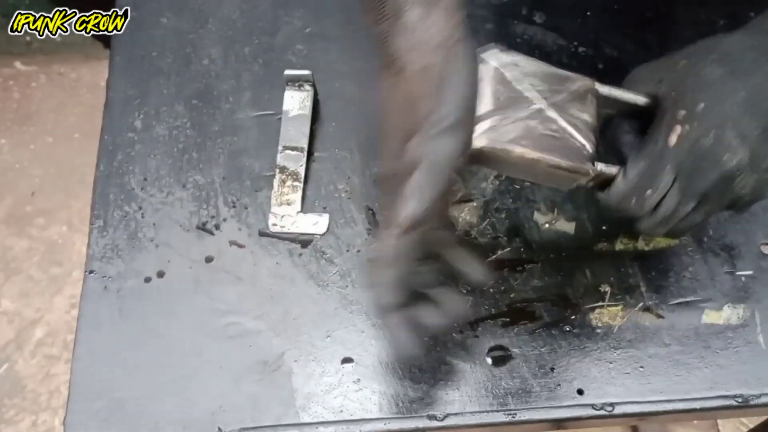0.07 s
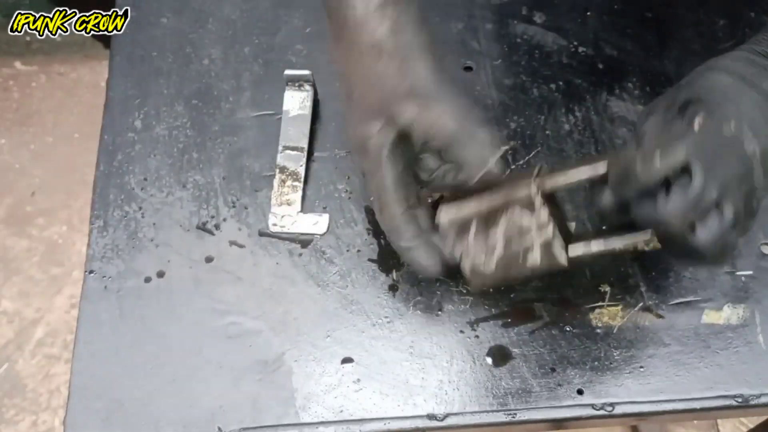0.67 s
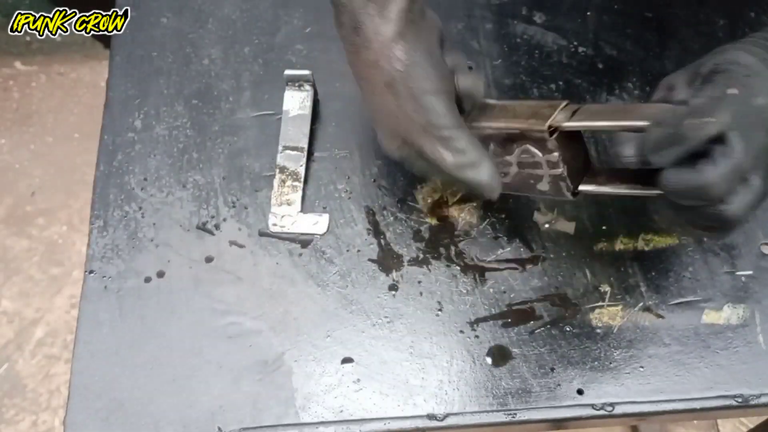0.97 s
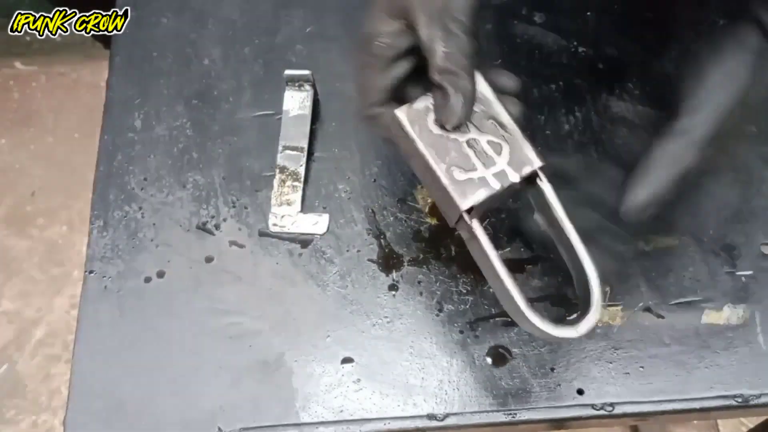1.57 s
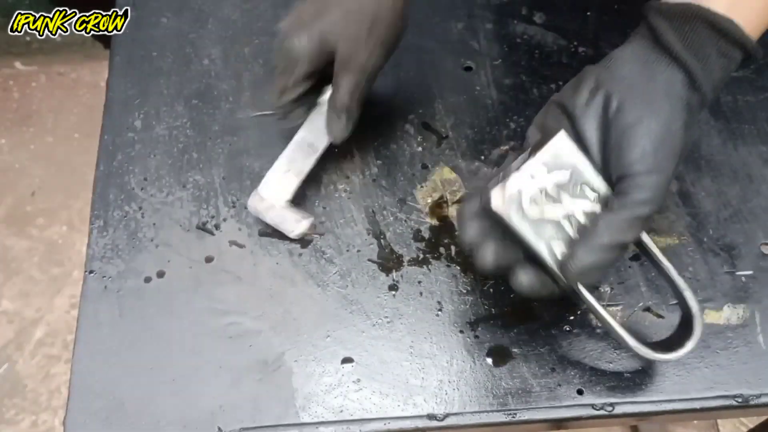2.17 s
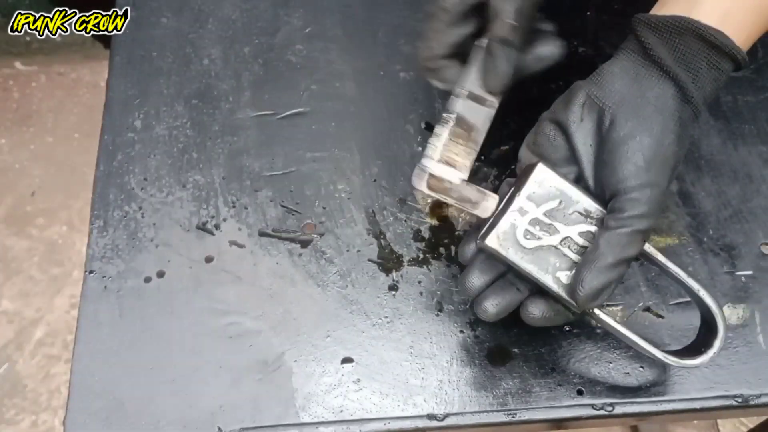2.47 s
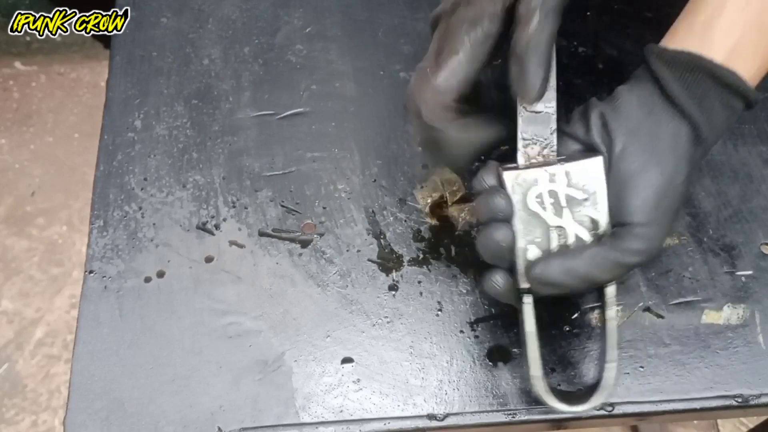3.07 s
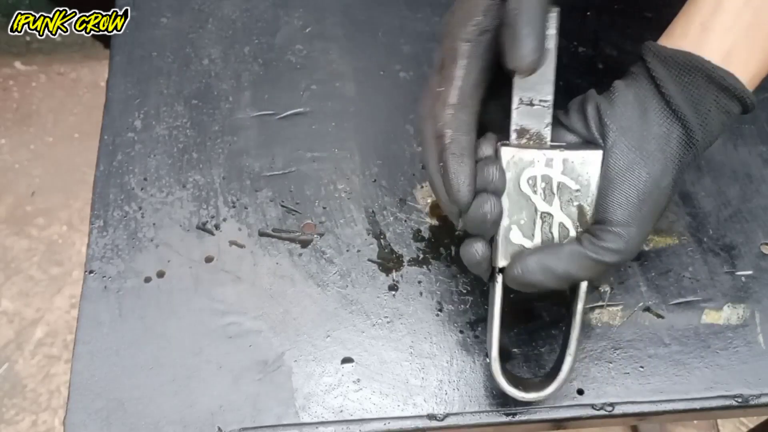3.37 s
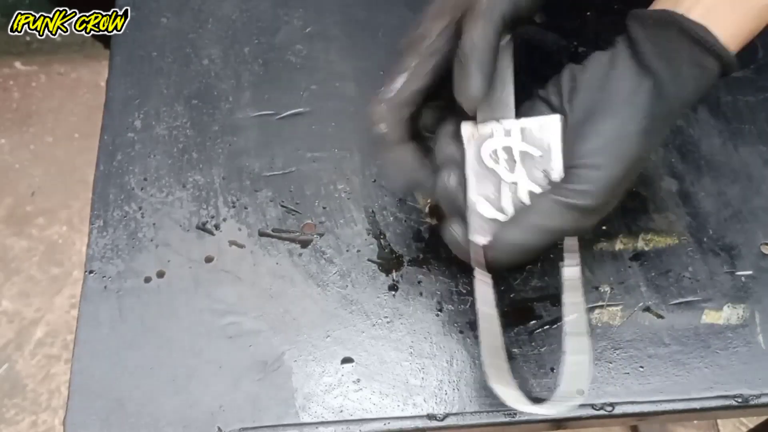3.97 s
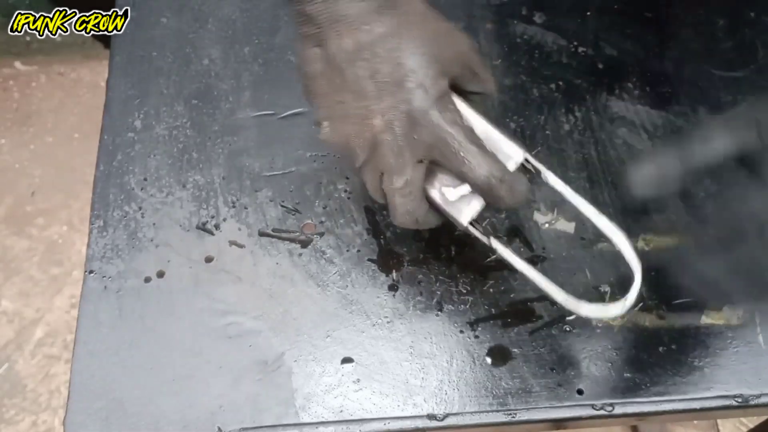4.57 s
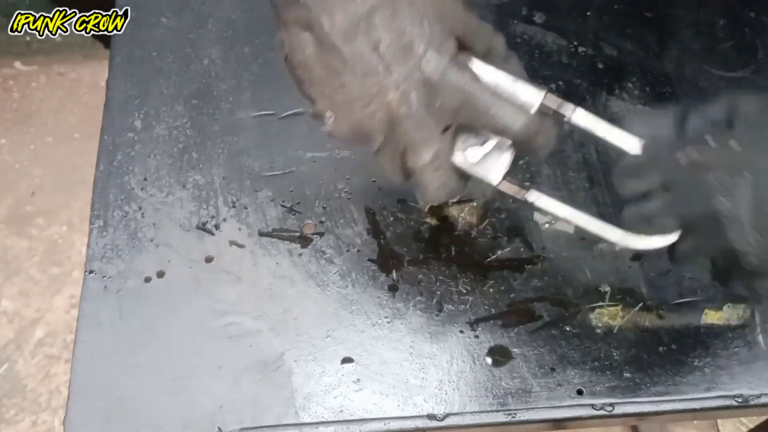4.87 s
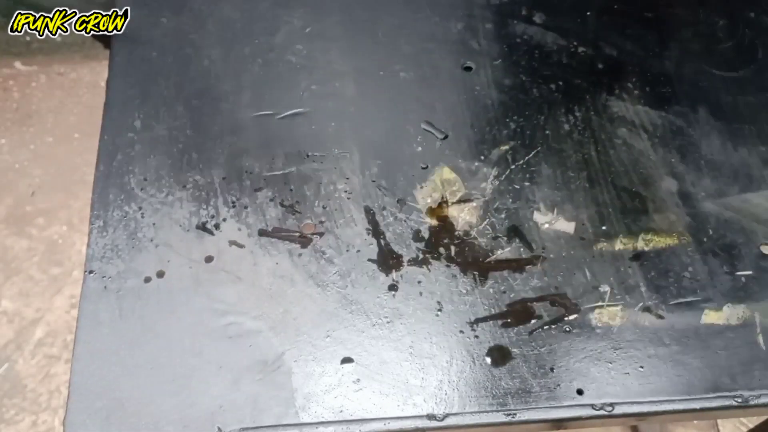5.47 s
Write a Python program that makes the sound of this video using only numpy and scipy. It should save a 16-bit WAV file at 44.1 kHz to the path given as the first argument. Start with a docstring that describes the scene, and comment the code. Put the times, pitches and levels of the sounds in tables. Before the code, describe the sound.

Close to the microphone in a hard-walled workshop, a loud metallic clank and thump come first as a padlock hits a metal bench. Lighter, irregular clacks of its shackle follow, with soft glove rubbing. A flat key drags, taps and clicks its way into the lock until the bolt gives a bright snap. After a quieter moment come two last ringing clinks, over a faint low hum.

```python
"""A hard, echoing workshop, a small microphone close to a sheet-metal bench. A heavy steel padlock is
tipped onto the bench, which thumps and rings; turned over in gloved hands, its shackle clacks in the body.
At 2.2 s a flat key is slid off the bench, then tapped into the slot and pushed until the bolt snaps at
3.9 s. Gloves rub, and the shackle clacks again at the end. Throughout, the microphone's gain control
ducks the loudest blows and the room hums faintly behind."""
import sys
import numpy as np
from scipy import signal
from scipy.fft import rfft, irfft
from scipy.io import wavfile
from scipy.ndimage import uniform_filter1d

SR = 44100
rng = np.random.default_rng(int(sys.argv[2]) if len(sys.argv) > 2 else 0)


def transcribe(u):
    """Save the signal u as a 16-bit wav file named by the first command-line argument.

    u: samples, shape (n,) or (channels, n), limited to [-1, 1]; the rate is SR.
    q: integer samples, one column per channel.
    """
    v = np.clip(np.atleast_2d(u).T, -1, 1)
    q = np.round(v * 32767).astype(np.int16)
    wavfile.write(sys.argv[1], SR, q)


N = 247401
TIME = np.arange(N) / SR


# steel contacts near the microphone: t/s, lead of a first touch/s (0: none), chatter/s, knock/dB, crack/dB,
# low shackle ring/dB, body ping/dB, high shackle ring/dB, echoes against the direct sound/dB
CONTACTS = [(0.1134, 0.0039, 0.0044, -32, -36.5, -52, -46, -41, -2.5),
            (.125, 0.00094, 0.03, -6, 5, -8, -5, -10.5, -11.5),
            (0.18, 0.0034, 0.16, -42.5, -22, -16, -23.5, -22.5, -2),
            (.249, 0, 0.022, -35, -27, -23.5, -32, -32.5, -22),
            (0.494, 0.022, .13, -43, -27.5, -30, -34, -28, -5),
            (0.5584, 0.025, 0.11, -45.5, -24.5, -33, -35, -48, -6),
            (0.826, 0.0031, 0.026, -61.5, -59, -75, -65.5, -62, -3.5),
            (0.9015, 0.0054, 0.036, -56.5, -39, -50.5, -70, -64, -9.5),
            (1.237, 0.0049, 0.015, -58.5, -57.5, -75, -51, -77.5, -0.5),
            (1.2856, 0, 0.0075, -45.5, -45, -48.5, -48.5, -71, -4),
            (1.3836, 0.004, 0.0075, -49.5, -51, -64, -50, -61, -4.5),
            (1.564, 0.02, 0.055, -39.5, -36, -55, -27.5, -59, -5.5),
            (1.929, 0.0095, 0.069, -46.5, -44.5, -46.5, -49.5, -53, -2),
            (1.965, 0, 0.034, -44, -35, -34.5, -46, -44, -8.5),
            (2.7, 0.0064, 0.14, -62, -39.5, -39.5, -74, -54, -3.5),
            (2.728, 0, .045, -68, -47, -60, -69.5, -53.5, 0.5),
            (2.7703, .007, 0.044, -45.5, -33, -37, -46, -48, -5.5),
            (3.329, 0.0046, 0.043, -42.5, -31, -38, -44, -40, -7.5),
            (3.9086, 0.0016, 0.024, -30.5, -19, -39, -38, -47, -7.5),
            (5.1, 0.00077, .02, -69, -67, -75.5, -78, -83.5, 0.5),
            (5.3112, 0.0096, 0.0077, -47, -46.5, -55, -50, -54, -5),
            (5.4489, 0.0059, 0.057, -41, -23.5, -37, -41, -32, -3.5),
            (5.5284, 0.012, 0.078, -53, -29, -23.5, -44, -30.5, -8.5)]
CASE_KNOCKS = [(0.4942, -51), (1.385, -63.5), (1.93, -55.5), (3.805, -61), (3.886, -50.5), (3.909, -37),
               (5.451, -48.5)]   # blows that sound the hollow case: t/s, level/dB
CASE_MODES = [(880, 5.5, 0.02), (979, -1.5, 0.13), (1118, 6, 0.017)]   # the case: f/Hz, level/dB, t60/s
FREE_RINGS = [(0.124, -12), (0.5, -50), (5.53, -37.5)]   # blows after which the shackle rings on: t/s, level/dB
SHACKLE_MODES = [(2637, -12, 0.32), (2745, -6.5, 0.27), (2815, -5, 0.41), (2868, 2, 0.5),
                 (3023, -8.5, 0.56), (3778, -14, .45), (4270, -9.5, 0.48), (4477, -11, .36),
                 (5200, -13, 0.3), (5400, -7, 0.27), (5600, -7, .33), (5885, -6, .35), (6725, -8, 0.4),
                 (6973, -10, 0.38)]   # the free shackle: f/Hz, level/dB, t60/s
def padlock(touch_db=-6, touch_db_per_s=-800, touch_chatter_s=0.017):
    """Close up, many clacks are led by a light touch; some blows sound the case or the free shackle."""
    out = np.zeros(N)
    for s, lead_s, chatter_s, *levels_db in CONTACTS:
        add(out, s, clack(chatter_s, *levels_db))
        if lead_s > 0:
            touch_gain = from_db(touch_db + touch_db_per_s * lead_s)   # the earlier, the lighter
            add(out, s - lead_s, touch_gain * clack(touch_chatter_s, *levels_db))
    for s, db in CASE_KNOCKS:
        case = from_db(db) * ring(CASE_MODES, vary_db=2, detune=0.01, size=8192)
        add(out, s, workshop(case, room_db=-1.5))
    for s, db in FREE_RINGS:
        add(out, s, from_db(db) * ring(SHACKLE_MODES, vary_db=0.5))
    return out


KNOCK_SPECTRUM = [(100, -48), (300, -26), (520, -16), (750, -5.5), (1000, -3), (1280, -4.5), (1650, -1.5),
                  (2000, 1.5), (2450, -2), (3000, 4.5), (4500, -34)]   # the dull part of a clack: f/Hz, level/dB
CRACK_SPECTRUM = [(900, -28.5), (2000, -28.5), (2700, -0.5), (3500, -2), (4900, -0.5), (6200, 2),
                  (7600, -6), (9000, -3.5), (15000, -1)]   # its bright part: f/Hz, level/dB
LOCK_MODES = [
    [(2875, 0, .06), (2845, -5, .05), (2755, -10, .04), (3025, -11, .04)],
    [(4030, 0, .014), (4140, -9, .025), (4430, -13, .03)],
    [(5440, 0, .05), (5660, -1, .05), (5860, -4, .05), (6200, -9, .04)],
    [(6730, -5, .05), (6970, -5, .04), (7300, -2, .035), (7570, 0, .05)],
]   # the held lock in four groups (low, ping, high, top): f/Hz, level/dB, t60/s
GRIP_DETUNE = [.003, .008, .012, .015]   # the grip shifts the pitches: spread/fraction for each group
def clack(chatter_s, knock_db, crack_db, low_db, ping_db, high_db, room_db, ping_echo_share=0.69):
    """Steel on steel: a knock, a bright crack and a ring choked by the glove, echoed by the walls."""
    knock = from_db(knock_db) * burst(KNOCK_SPECTRUM, t60=chatter_s * 1.1, rise_s=0.00025)
    crack = from_db(crack_db) * burst(CRACK_SPECTRUM, t60=chatter_s * 0.52, rise_s=0.00051)
    groups_db = [low_db, ping_db, high_db, crack_db - 9.5]   # the top group follows the crack
    low, ping, high, top = [from_db(db) * ring(modes, vary_db=1.5, detune=detune, size=8192)
                            for db, modes, detune in zip(groups_db, LOCK_MODES, GRIP_DETUNE)]
    out = workshop(knock + crack + low + ping_echo_share * ping + high + top, room_db)
    add(out, 0, (1 - ping_echo_share) * ping)   # the palm shields this part from the walls
    return out


BOLT_SNAPS = [(3.9086, -16)]   # the key drives the spring bolt home: t/s, level before the low cut/dB
BOLT_SPECTRUM = [(700, -39), (1300, -45), (1650, -1), (2100, 2), (2650, 11.5), (3100, 6), (3450, 2.5),
                 (4200, 1), (5200, -10.5), (7500, 0.5), (9000, -28)]   # the snap: f/Hz, level/dB
def bolt(low_cut_hz=1000):
    """The released bolt strikes its stop in one short, dense, bright snap, with the bass filtered out."""
    out = np.zeros(N)
    low_cut = signal.butter(4, low_cut_hz, "high", fs=SR, output="sos")
    for s, db in BOLT_SNAPS:
        snap = signal.sosfilt(low_cut, burst(BOLT_SPECTRUM, t60=0.0073, rise_s=0.00041))
        add(out, s, workshop(from_db(db) * snap, room_db=-3.5))
    return out


BENCH_JOLTS = [(0.1255, -11, -22), (3.909, -51, -63.5)]   # the lock jolts the bench: t/s, thump/dB, sheet ring/dB
THUMP_MODES = [(76, -13, 0.036), (115.3, -4, 0.082), (166, 4, 0.036), (204, -4, 0.02), (345, 3, 0.036),
               (510, 6, 0.026)]   # the flexing bench top: f/Hz, level/dB, t60/s
SHEET_MODES = [(525, -6.5, .048), (640, -5, 0.074), (720, -3, 0.084), (772, -5, .08), (810, -2, .11)]   # its ringing sheet: f/Hz, level/dB, t60/s
def bench():
    """The lock's weight flexes the bench: the thump reaches the microphone dry, the ring with echoes."""
    out = np.zeros(N)
    for s, thump_db, sheet_db in BENCH_JOLTS:
        add(out, s, from_db(thump_db) * ring(THUMP_MODES, vary_db=1))
        add(out, s, workshop(from_db(sheet_db) * ring(SHEET_MODES), room_db=0))
    return out


KEY_DRAGS = [(2.238, -51), (2.299, -55)]   # gritty pushes across the bench: t/s, level/dB
KEY_MODES = [(2520, -2, 2.3), (3500, -3, 3.2)]   # the key held free: f/Hz, level/dB, t60/s
KEY_TICKS = [(2.9514, 0.047, -61, -62.5), (2.9876, 0.015, -59, -50.5), (3.059, .06, -59.5, -51),
             (3.079, 0.051, -57, -54.5), (3.524, 0.0095, -67, -59.5), (3.6285, 0.13, -65, -61),
             (3.696, .014, -59, -56.5), (3.8056, 0.015, -60, -60.5)]   # the key in the slot: t/s, chatter/s, knock/dB, crack/dB
def key(lift_s=2.52):
    """The flat key is dragged off the bench, sings faintly once free, then ticks its way into the slot."""
    out = np.zeros(N)
    for s, db in KEY_DRAGS:
        drag = from_db(db) * burst(SCUFF_SPECTRUM, t60=0.12, rise_s=0.017)
        add(out, s, workshop(drag, room_db=-1.5))
    add(out, lift_s, from_db(-71) * ring(KEY_MODES, vary_db=0.5))
    for s, chatter_s, knock_db, crack_db in KEY_TICKS:
        ring_db = crack_db - 10
        add(out, s, clack(chatter_s, knock_db, crack_db, ring_db, ring_db, ring_db, room_db=-4))
    return out


# the hands shift their grip: firmest pressure t/s, length/s, relative scuff/dB, relative scrape/dB
STROKES = [(0.833, .09, -55, -70), (1.178, 0.13, -65.5, -63.5), (2.254, .17, -50, -57),
           (2.316, 0.17, -59, -54), (2.47, 0.078, -72.5, -66.5), (2.919, 0.38, -67, -60.5),
           (3.073, 0.14, -61, -57.5), (3.17, 0.084, -67.5, -80), (3.68, .15, -68.5, -59.5),
           (3.906, 0.086, -71, -32.5), (4.281, 0.28, -73, -73.5), (4.471, .25, -72, -74),
           (4.689, .12, -70, -73.5), (4.872, 0.41, -66, -76), (4.999, 0.28, -76.5, -68.5),
           (5.115, 0.29, -58, -75), (5.443, 0.057, -53, -38), (5.585, 0.17, -64, -46)]
SCUFF_SPECTRUM = [(100, -14.5), (350, 4.5), (700, -0.5), (1400, -0.5), (2500, -9), (5000, -21)]   # rubbing on glove or bench: f/Hz, level/dB
SCRAPE_SPECTRUM = [(800, -15.5), (2000, -9), (2900, -5), (3600, 0), (5500, -2.5), (7200, 1), (9000, -9.5)]   # sliding steel: f/Hz, level/dB
GLOVE_SWISHES = [(4.83, -63)]   # a glove slides off the shackle: t/s, level/dB
SWISH_SPECTRUM = [(1200, -19), (2100, -9), (2450, -0.5), (2900, -23.5), (4000, -20.5)]   # that swish: f/Hz, level/dB
def rubbing(grain_db=1.5, slips_per_s=220, patchy_db=3, patches_per_s=22, trim_db=-4):
    """Gloves and steel slide in tiny slips under an uneven pressure, heard close and dry."""
    scuff_level, scrape_level = from_db(-74.5), from_db(-84.5)   # the hands just holding the lock
    for s, length_s, scuff_db, scrape_db in STROKES:
        pressure = hand_pressure(s, length_s)
        scuff_level = np.hypot(scuff_level, from_db(scuff_db) * pressure)
        scrape_level = np.hypot(scrape_level, from_db(scrape_db) * pressure)
    scuff = scuff_level * from_db(patchy_db * drift(patches_per_s)) * noise(SCUFF_SPECTRUM, N)
    scrape = scrape_level * from_db(patchy_db * drift(patches_per_s)) * noise(SCRAPE_SPECTRUM, N)
    out = (scuff + scrape) * from_db(grain_db * drift(slips_per_s) + trim_db)
    for s, db in GLOVE_SWISHES:
        add(out, s, from_db(db) * burst(SWISH_SPECTRUM, t60=0.32, rise_s=0.13, size=16384))
    return out


def hand_pressure(peak_s, length_s, rise_share=0.26, edge_db=-21.5):
    """The pressure of a hand builds quickly and eases off more slowly."""
    before = (peak_s - TIME) / rise_share
    after = (TIME - peak_s) / (1 - rise_share)
    from_peak = np.maximum(before, after) / length_s   # 1 at both ends of the stroke
    return from_db(edge_db * np.minimum(from_peak, 10))


def workshop(sound, room_db):
    """The direct sound plus its echoes, which differ for every place that the lock is moved to."""
    echoes = signal.fftconvolve(sound, wall_echoes())
    echoes *= from_db(room_db) * np.sqrt(np.sum(sound ** 2) / np.sum(echoes ** 2))
    add(echoes, 0, sound)
    return echoes


ROOM_T60 = [(150, .15), (400, 0.34), (1000, 0.41), (2800, 0.41), (5500, 0.38), (8000, 0.35)]   # decay of the workshop: f/Hz, t60/s
ECHO_COLOUR = [(150, -19.5), (400, -4.5), (900, -2.5), (2000, 2), (3000, -0.5), (5000, 1.5), (8000, 2)]   # its echoes at the microphone: f/Hz, level/dB
def wall_echoes(first_echo_s=0.00025, build_s=0.0018, size=24576):
    """Hard walls return a dense tail that dies at its own rate in each band."""
    t, hz = TIME[:size], np.fft.rfftfreq(size, 1 / SR)
    white, tail = rfft(rng.standard_normal(size)), 0
    edges_hz = np.geomspace(120, 12000, 9)
    onset = 1 - np.exp(-np.maximum(t - first_echo_s, 0) / build_s)
    for low, high in zip(edges_hz, edges_hz[1:]):
        centre = np.sqrt(low * high)
        decay = onset * from_db(-60 * t / at_hz(ROOM_T60, centre))
        band = irfft(white * (hz >= low) * (hz < high), size)
        tail += from_db(at_hz(ECHO_COLOUR, centre)) * band * decay / np.sqrt(np.sum(decay ** 2))
    return tail


AIR_SPECTRUM = [(25, -29), (60, -23), (80, -12.5), (105, -2), (160, 1), (220, 4.5), (320, -3), (500, -14.5),
                (1000, -27.5), (2000, -25.5), (4000, -37), (7500, -37.5), (9000, -47.5), (15000, -53.5)]   # still air in the workshop: f/Hz, level/dB
MACHINE_HUM = [(108, -75.5), (220, -83), (275, -75.5)]   # tones of a faint machine: f/Hz, level/dB
BACKGROUND_DUCKS = [(.1, 0.063, -5.5), (2.59, 0.067, -9.5)]   # the recorder turns both down: t/s, half width/s, level change/dB
def room_tone(air_db=-66.5):
    """Behind everything, steady rumble and hum, which the recorder briefly turns down."""
    hum = sum(from_db(db) * np.sqrt(2) * np.sin(2 * np.pi * (hz * TIME + rng.random()))
              for hz, db in MACHINE_HUM)
    duck_db = sum(db * np.exp(-((TIME - s) / width_s) ** 2) for s, width_s, db in BACKGROUND_DUCKS)
    return from_db(duck_db) * (from_db(air_db) * noise(AIR_SPECTRUM, N) + hum)


def ring(modes, vary_db=0, detune=0, size=32768, rise_s=0.0006):
    """Struck modes; contact point and grip change their strengths, signs and pitches a little."""
    t, out = TIME[:size], 0
    for hz, db, t60 in modes:
        strength, shift, side = rng.standard_normal(3)
        amplitude = np.sign(side) * from_db(db + vary_db * strength)
        tone = np.sin(2 * np.pi * hz * (1 + detune * shift) * t)
        out += amplitude * from_db(-60 * t / t60) * tone
    return as_blow(out * (1 - np.exp(-t / rise_s)))


def burst(spectrum, t60, rise_s, size=8192):
    """The brief clatter of many damped modes as two faces meet."""
    t = TIME[:size]
    return as_blow(noise(spectrum, size) * from_db(-60 * t / t60) * (1 - np.exp(-t / rise_s)))


def noise(spectrum, size):
    """Coloured noise of rms 1."""
    colour = from_db(at_hz(spectrum, np.fft.rfftfreq(size, 1 / SR)))
    x = irfft(rfft(rng.standard_normal(size)) * colour, size)
    return x / np.std(x)


def drift(per_s):
    """A random level that wanders at a given rate."""
    return np.interp(TIME * per_s, np.arange(8192), rng.standard_normal(8192))


def as_blow(x):
    """Scale to the energy of 10 ms at rms 1."""
    return x * np.sqrt(SR / 100 / (np.sum(x ** 2) + 1e-20))


def from_db(db):
    """Decibels to gain."""
    return 10 ** (np.asarray(db) / 20)


def at_hz(points, hz):
    """Read a table on a log-frequency axis."""
    f, value = np.transpose(points)
    return np.interp(np.log(np.maximum(hz, 1)), np.log(f), value)


def add(track, s, sound):
    """Mix a sound in at a time."""
    i = max(round(s * SR), 0)
    track[i:i + len(sound)] += sound[:max(N - i, 0)]


def scene():
    """All that reaches the one microphone at the bench."""
    return (padlock() + bolt() + bench() + key() + rubbing() + room_tone())[None]


def gain_control(x, threshold_db=-19, squeeze=0.54, release_db_per_s=110):
    """Loud blows pull the gain down at once; it creeps back while the room is still ringing."""
    level_db = 10 * np.log10(np.maximum(uniform_filter1d(x ** 2, size=66), 1e-12))
    over_db = squeeze * np.maximum(level_db - threshold_db, 0)
    release_db = release_db_per_s * TIME
    held_db = np.maximum.accumulate(over_db + release_db, axis=-1) - release_db
    return x * from_db(-uniform_filter1d(held_db, size=32))


def record(dry, band_edge_hz=9000, top_cut_hz=15400):
    """The small microphone: gain control, soft limiter, low-pass, slightly rounded peaks, a top cut."""
    limited = 0.72 * np.tanh(gain_control(dry) / 0.72)
    narrow = signal.sosfilt(signal.cheby2(10, 50, band_edge_hz, fs=SR, output="sos"), limited)
    rounded = 1.7 * np.tanh(narrow / 1.7)
    return signal.sosfilt(signal.cheby2(12, 60, top_cut_hz, fs=SR, output="sos"), rounded)


dry = scene()
out = record(dry)
transcribe(out)
```